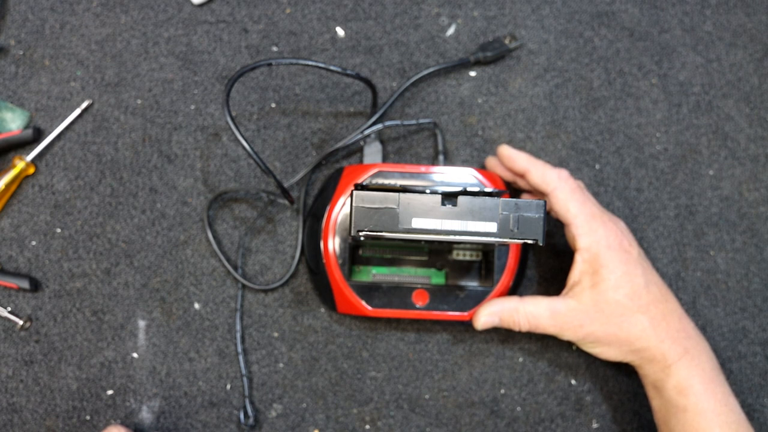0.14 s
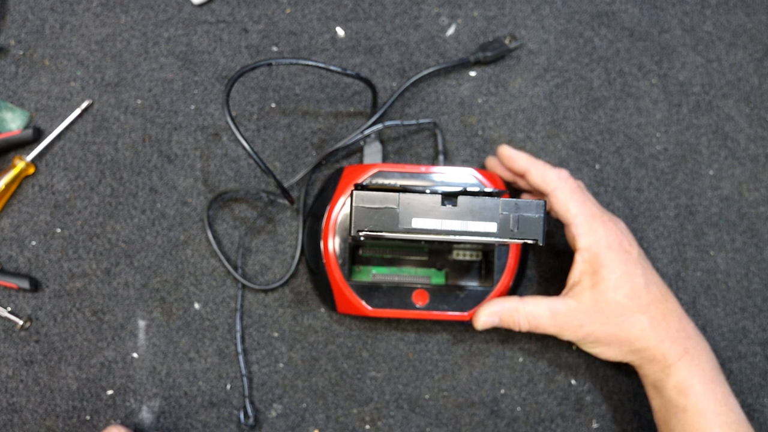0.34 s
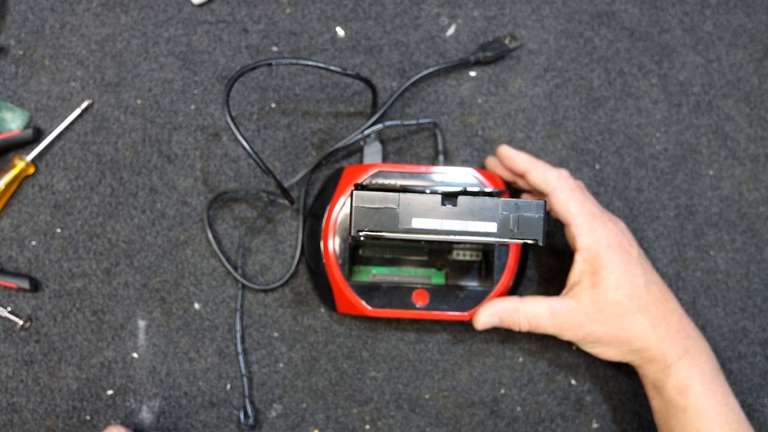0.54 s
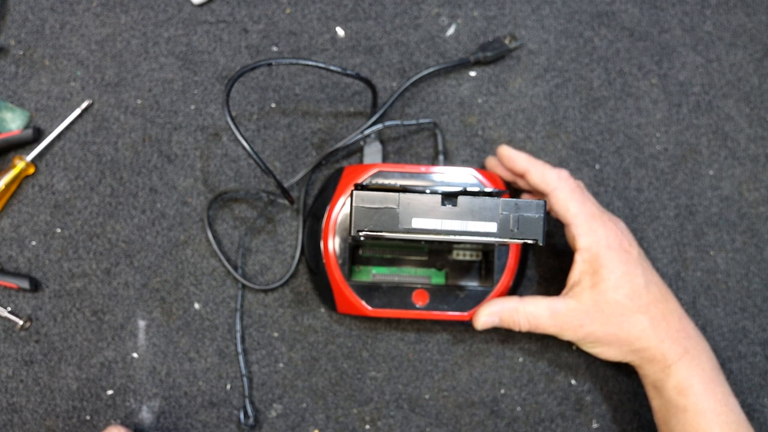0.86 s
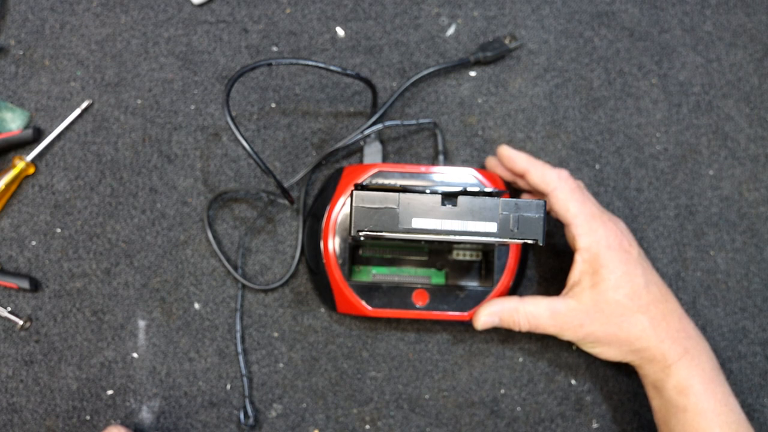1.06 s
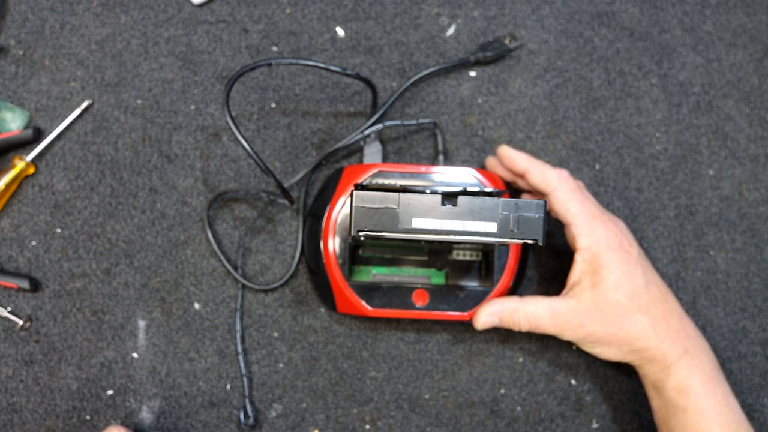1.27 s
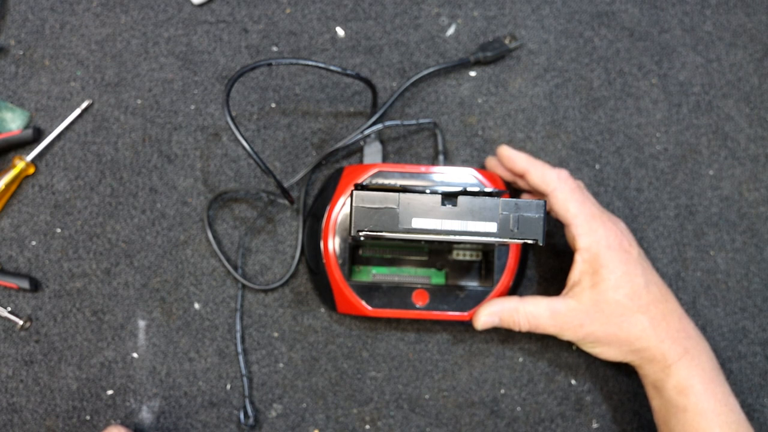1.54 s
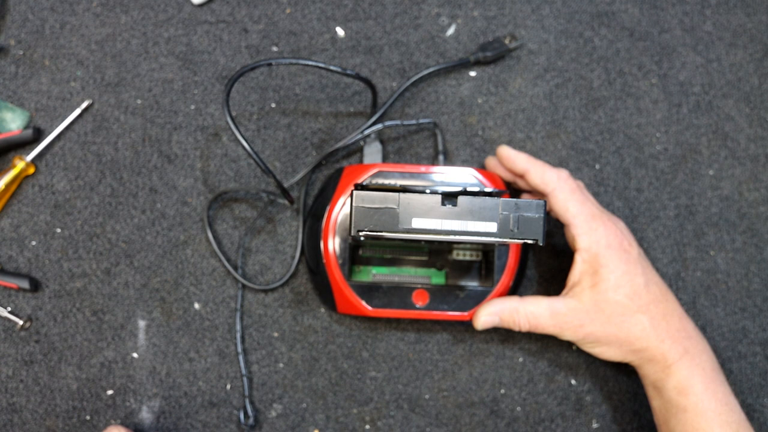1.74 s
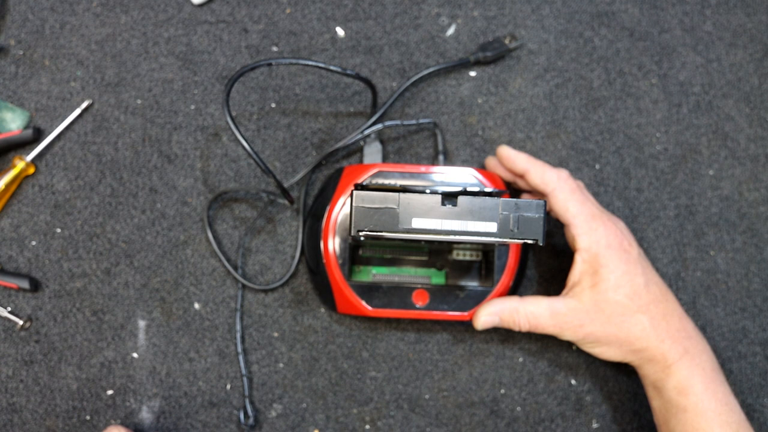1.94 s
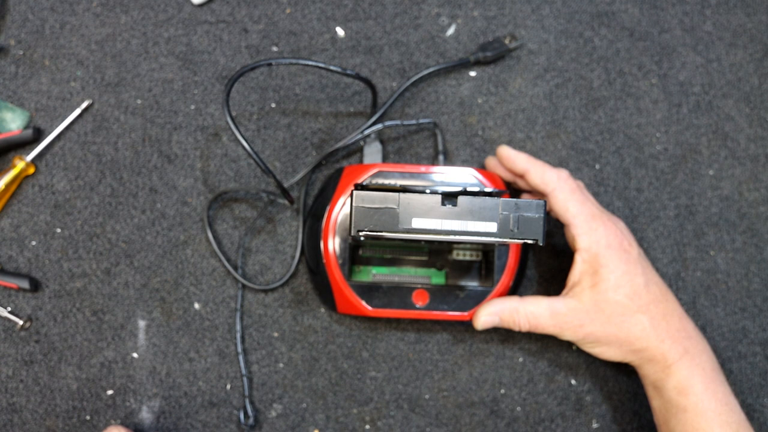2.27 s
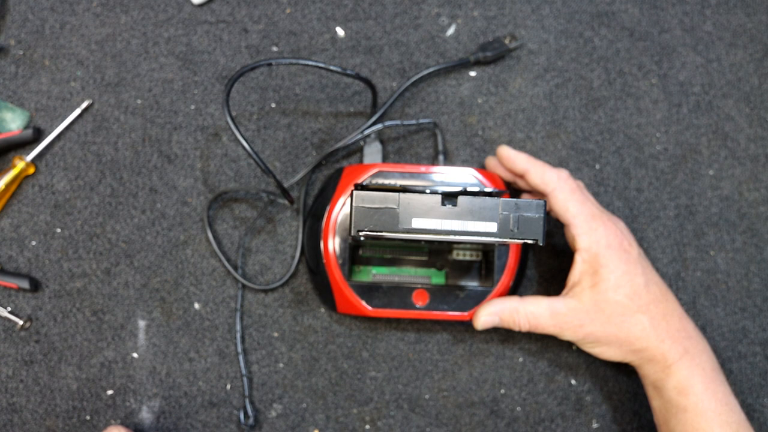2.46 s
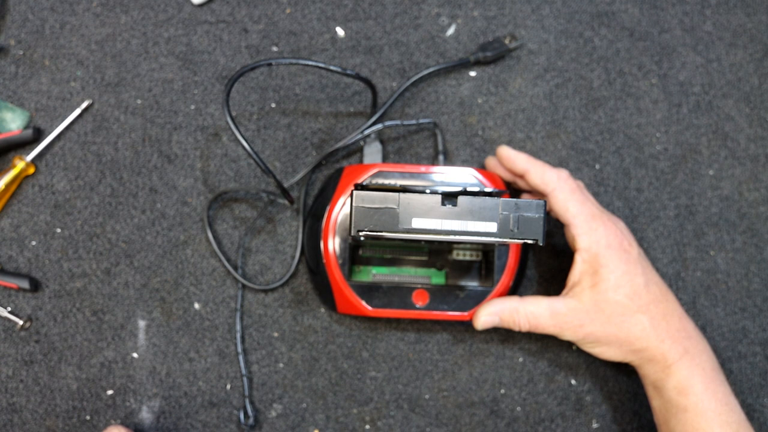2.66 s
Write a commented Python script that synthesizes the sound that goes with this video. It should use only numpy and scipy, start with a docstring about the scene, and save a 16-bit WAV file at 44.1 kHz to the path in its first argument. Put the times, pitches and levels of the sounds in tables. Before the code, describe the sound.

A failing hard drive whines faintly near 2 kHz over low mains hum and a swelling drone in a dry room. Thin hiss starts at 0.08 s; from 0.27 to 0.62 s irregular knocks mix with short raspy, squeaky scrapes. A loud sharp clack with a low thump at 0.72 s ends the hiss. The whine sags around 1.45 and 2.15 s, recovering each time with a slight buzz, amid faint ticks until 2.1 s and one last at 2.77 s.

```python
"""Mains hum and a low swelling drone fill a room where the spindle of a failing hard drive whines in a dock.
The heads load with a thin hiss, then the arm knocks and the heads scrape across the platter.
They park with one sharp clack, and the whine sags and recovers while the mechanism ticks faintly.
Steady tones are summed sines, hiss and rasp are shaped noise, and blows are decaying modes,
most with a dense noise crack; a short sparse tail adds the room to the drive's impacts."""
import sys
import numpy as np
from scipy import signal
from scipy.fft import rfft, irfft, next_fast_len
from scipy.io import wavfile
from scipy.ndimage import uniform_filter1d

SR = 44100
rng = np.random.default_rng(int(sys.argv[2]) if len(sys.argv) > 2 else 0)


def wav_record(signal):
    """Record a signal, one row per channel, as 16-bit PCM in the file named by sys.argv[1]."""
    frames = np.transpose(np.atleast_2d(signal))
    bounded = np.clip(frames, -1, 1)
    # unit amplitude maps onto the largest positive 16-bit level
    quanta = np.round(bounded * 32767).astype(np.int16)
    wavfile.write(sys.argv[1], SR, quanta)


N = 123479
T = np.arange(N) / SR


def amp(db):
    """Decibel law: level to amplitude ratio."""
    return 10 ** (np.asarray(db) / 20)


def unit(x):
    """Normalisation to unit root-mean-square level."""
    return x / np.sqrt(np.mean(x ** 2) + 1e-20)


def add(mix, start_s, sound):
    """Superposition of a sound on the mix from its start time, in place."""
    part = mix[round(start_s * SR):][:len(sound)]
    part += sound[:len(part)]


def coloured(x, points):
    """Spectral shaping: a gain curve drawn in dB over log frequency, then unit level."""
    hz, db = np.transpose(points)
    size = next_fast_len(len(x))
    bins_hz = np.fft.rfftfreq(size, 1 / SR)
    gain = amp(np.interp(np.log(bins_hz + 1), np.log(hz), db))
    return unit(irfft(rfft(x, size) * gain, size)[:len(x)])


def noise(points, size=N):
    """Coloured noise: Gaussian white noise under a spectral shape."""
    return coloured(rng.standard_normal(size), points)


def tone(hz):
    """Phase integration: a unit-level sine on a steady or moving frequency."""
    cycles = np.cumsum(hz * np.ones(N)) / SR + rng.random()
    return np.sqrt(2) * np.sin(2 * np.pi * cycles)


def waver(hz):
    """Band-limited chance: unit-level noise under a Gaussian low-pass of width hz."""
    spectrum = rfft(rng.standard_normal(N))
    low_pass = np.exp(-(np.fft.rfftfreq(N, 1 / SR) / hz) ** 2)
    return unit(irfft(spectrum * low_pass, N))


def ring(modes, size=6000):
    """Modal decay: exponentially dying sines, each started with either sign."""
    t = T[:size]
    out = np.zeros(size)
    for hz, db, t60 in modes:
        out += rng.choice([-1, 1]) * amp(db - 60 * t / t60) * np.sin(2 * np.pi * hz * t)
    return out


BASS_HZ, MID_HZ, TREBLE_HZ = 830, 2420, 4400
CRACK_DECAY_S, RISE_S = .003, .0007
TAIL_DB, TAIL_DECAY_S, TAIL_HIGH_HZ = -17, 0.023, 4700


def blow(modes, crack, crack_db, bass_db, treble_db, size=6000):
    """Impact excitation: modes, a dense crack and its duller tail, tilted by where the blow lands."""
    t = T[:size]
    dense = amp(crack_db) * noise(crack, size=size)
    dull = signal.lfilter(*signal.butter(2, TAIL_HIGH_HZ, fs=SR), dense)
    sound = ring(modes)
    sound += dense * np.exp(-t / CRACK_DECAY_S)
    sound += dull * amp(TAIL_DB) * np.exp(-t / TAIL_DECAY_S)
    bins_hz = np.fft.rfftfreq(2 * size, 1 / SR)
    tilt_db = np.interp(bins_hz, [BASS_HZ, MID_HZ, TREBLE_HZ], [bass_db, 0, treble_db])
    tilted = irfft(rfft(sound, 2 * size) * amp(tilt_db))[:size]
    return tilted * np.minimum(t / RISE_S, 1)


# harmonics of the mains supply: (frequency [Hz], level [dB])
MAINS_HARMONICS = [(50, -45.5), (150, -55.5), (200, -45), (250, -70), (300, -61.5), (350, -61.5),
                   (400, -58)]


def mains_hum():
    """Harmonic series: steady sines at multiples of the mains frequency."""
    return sum(amp(db) * tone(hz) for hz, db in MAINS_HARMONICS)


# swell of the drone's fundamental: (time [s], level [dB])
DRONE_SWELL = [(0.0, -54), (0.05, -49.5), (0.18, -52.5), (0.39, -42), (0.91, -38.5), (1.32, -40.5),
               (2.07, -40), (2.63, -54.5), (2.8, -59)]
DRONE_HZ, DRONE_FIFTH_DB = 97.35, -16.5


def drone():
    """Amplitude envelope: a low tone and a weaker pure fifth above it swell and fade together."""
    swell = amp(np.interp(T, *np.transpose(DRONE_SWELL)))
    fifth = amp(DRONE_FIFTH_DB) * tone(DRONE_HZ * 3 / 2)
    return swell * (tone(DRONE_HZ) + fifth)


# spectral shape of the even room noise: (frequency [Hz], relative density [dB])
AIR_SHAPE = [(20, -92), (45, -71.5), (130, -78), (230, -80.5), (330, -86), (520, -87), (800, -86),
             (1060, -88.5), (1500, -94), (2500, -97.5), (2950, -92), (3300, -99), (3700, -94.5),
             (4000, -100), (4300, -99.5), (4800, -101), (6000, -101), (10000, -104), (15500, -106)]
# spectral shape of the low rumble: (frequency [Hz], relative density [dB])
RUMBLE_SHAPE = [(20, -39), (60, -54), (80, 17), (95, 2), (125, -45), (400, -32)]
AIR_DB, RUMBLE_DB = -52, -56


def room_noise():
    """Stationary noise: an even room sound and a low rumble."""
    return amp(AIR_DB) * noise(AIR_SHAPE) + amp(RUMBLE_DB) * noise(RUMBLE_SHAPE)


# course of the spindle speed, smoothed below: (time [s], speed [turns/s])
SPINDLE_COURSE = [(0, 83.3), (.96, 83.5), (1.2, 79.9), (1.42, 76.8), (1.49, 76.9), (1.66, 80.8),
                  (1.9, 77.4), (2.12, 74.3), (2.2, 74.8), (2.54, 82.5), (2.8, 83.6)]
FULL_PUSH_TURNS_PER_S2 = 9.4


def spindle_motion():
    """Rotational kinematics: the speed, and the motor's push (0 to 1) from its acceleration."""
    spin = uniform_filter1d(np.interp(T, *np.transpose(SPINDLE_COURSE)), size=2000)
    push = np.clip(np.gradient(spin) * SR / FULL_PUSH_TURNS_PER_S2, 0, 1)
    return spin, push


# orders of the whine: (multiple of the spindle speed)
WHINE_MULTIPLES = (24, 25)
# base level of each order, before resonance and push: (level [dB])
WHINE_LEVELS = [-66.5, -64.5]
WHINE_PEAK_HZ, WHINE_WIDTH_HZ, WHINE_OFF_DB = 2030, 95, -28
PUSH_DB = 3.5


def whine(spin, push):
    """Resonance: orders of the spindle speed grow as they near a mode of the case."""
    out = np.zeros(N)
    # only the first order grows with the push
    for order, db, driven in zip(WHINE_MULTIPLES, WHINE_LEVELS, (push, 0)):
        hz = order * spin
        near = 1 / np.hypot(1, ((hz - WHINE_PEAK_HZ) / WHINE_WIDTH_HZ) ** 2)
        out += amp(db + PUSH_DB * driven) * (amp(WHINE_OFF_DB) + near) * tone(hz)
    return out


# mean level of the buzz lines at full push: (frequency [Hz], level per line [dB])
BUZZ_LEVELS = [(300, -61), (900, -77), (2000, -73.5), (2900, -75.5), (3800, -88), (5200, -81.5),
               (9000, -82.5), (15000, -91)]
POLE_PAIRS, BUZZ_SCATTER_DB, BUZZ_FLICKER_HZ = 4, 2, 45


def motor_buzz(spin, push):
    """Electromagnetic forcing: ragged harmonics of the pole-pair rate while the motor speeds up."""
    out = np.zeros(N)
    for harmonic in range(2, 48):
        hz = harmonic * POLE_PAIRS * spin
        db = np.interp(hz.mean(), *np.transpose(BUZZ_LEVELS))
        db += BUZZ_SCATTER_DB * rng.standard_normal()
        out += amp(db) * np.sqrt(push) * waver(BUZZ_FLICKER_HZ) * tone(hz)
    return out


# hiss of the flying heads, with narrow whistles: (frequency [Hz], relative density [dB])
HEAD_HISS = [(1500, -20), (2300, -4), (3850, -7), (4000, 6), (4150, -8), (4520, -1), (4750, -11), (4970, 6),
             (5120, -13), (6300, -18), (7000, -6), (8200, -9), (8650, 1), (9300, -2), (10100, -9),
             (10800, -3), (11950, -11), (12500, -5), (13400, -17), (14600, -15), (14900, -1), (15200, -18),
             (16000, -26)]
HEADS_ON_S, HEADS_OFF_S, HEADS_FADE_S = .076, .708, .012
HEADS_DB, HEADS_FLUTTER_DB, HEADS_FLUTTER_HZ = -53.5, 1.3, 80


def heads():
    """Flow noise: a thin, unsteady hiss for as long as the heads fly over the platter."""
    flying = np.clip(np.minimum(T - HEADS_ON_S, HEADS_OFF_S - T) / HEADS_FADE_S, 0, 1)
    level = amp(HEADS_DB + HEADS_FLUTTER_DB * waver(HEADS_FLUTTER_HZ))
    return level * flying * noise(HEAD_HISS)


# knocks of the arm, and two late low ticks of the mechanism, before the case:
# (time [s], level [dB], bass tilt [dB], treble tilt [dB])
KNOCK_HITS = [(0.2687, -31.5, 10, 7.5), (.273, -32, 13, -10), (.278, -35.5, 19, -25),
              (.282, -33.5, 14, 1.5), (.2915, -43.5, 15, 3), (0.308, -40.5, 16, 3.5),
              (.3325, -34.5, 16, -3.5), (.357, -42.5, 14, -6), (.368, -46, 19, -2), (.379, -53, 11, -3),
              (.4005, -37.5, 2, 6), (.4065, -40, 18.5, -18), (.4095, -33.5, 10.5, -5), (.413, -51, -8, -14),
              (.4225, -41.5, 20, 1.5), (.4405, -33, 12.5, -10), (.4475, -31.5, 6.5, -13),
              (.458, -43.5, 6, 9.5), (.461, -45.5, 22, -5), (.4865, -35, 13.5, -6), (.516, -48.5, 20, -7),
              (.557, -48, 24.5, -10), (.574, -40.5, 17, -6), (.584, -31.5, 10, -0.5),
              (.6035, -35.5, 14.5, -6), (.617, -31, 6.5, -5), (.623, -45, 19, 6), (1.662, -61, 21, -1),
              (2.769, -60.5, 18, 3.5)]
# modes of the case and arm, before detuning: (frequency [Hz], relative level [dB], decay by 60 dB [s])
CASE_MODES = [(715, -12.5, 0.045), (775, -13.5, 0.05), (825, -15, 0.045), (930, -16.5, 0.035),
              (1445, -25, 0.12), (2125, -2, 0.045), (2310, -5, 0.06), (2650, -3, 0.045), (3340, -4, 0.03),
              (3895, -10, 0.11), (4235, -1.5, 0.05), (4980, -7, 0.03), (5170, -5, 0.065), (5520, -10, 0.06),
              (7100, -15, 0.02)]
# spectral shape of a knock's dense crack: (frequency [Hz], relative density [dB])
KNOCK_CRACK = [(200, -26), (550, -40), (690, -8.5), (900, -12.5), (1200, -24), (1800, -22), (2150, 5.5),
               (3700, -6), (4400, 6), (4750, -0.5), (5350, 5.5), (5900, -20), (7100, -7), (9500, -25),
               (15000, -12.5)]
KNOCK_CRACK_DB = 2.5  # against the modes
# mode of the lid, before the case: (frequency [Hz], level [dB], decay by 60 dB [s])
LID_MODE = [(3910, -30.5, 0.14)]
LID_S = .586


def knocks():
    """Modal excitation: arm knocks and two late low ticks, each with slightly scattered mode
    frequencies, and once the lid rings."""
    out = np.zeros(N)
    for start_s, db, bass_db, treble_db in KNOCK_HITS:
        modes = [(hz * (1 + rng.uniform(-.0116, .008)), mode_db, t60) for hz, mode_db, t60 in CASE_MODES]
        add(out, start_s, amp(db) * blow(modes, KNOCK_CRACK, KNOCK_CRACK_DB, bass_db, treble_db))
    add(out, LID_S, ring(LID_MODE))
    return out


# scraping seeks, before the case: (time [s], length [s], level [dB])
SEEKS = [(0.336, 0.014, -46), (.352, 0.0064, -36.5), (0.36, 0.0092, -37), (0.371, 0.014, -38.5),
         (0.387, 0.0072, -31.5), (0.407, 0.01, -41), (0.426, 0.0034, -41), (0.437, 0.012, -45.5),
         (0.49, 0.0247, -45), (0.513, 0.012, -39.5), (0.524, 0.012, -35), (0.54, 0.0059, -35),
         (0.555, 0.0052, -36.5), (.563, 0.0063, -34.5), (0.584, 0.0061, -39), (0.599, 0.0054, -44),
         (0.693, 0.0087, -48.5)]
# spectral shape of the rasp: (frequency [Hz], relative density [dB])
RASP_SHAPE = [(540, -12), (780, -1), (1200, -13), (1800, -17.5), (2100, 2.5), (2700, 4), (3100, 0.5),
              (3450, -2.5), (4050, -2), (4400, -14), (4750, -5), (5200, -1), (6000, -7), (6900, -3.5),
              (7700, -20), (13000, -15)]
# modes of the head suspension: (frequency [Hz], relative level [dB], decay by 60 dB [s])
SUSPENSION_MODES = [(2650, -1, 0.025), (3895, -4, 0.07), (4290, -1, 0.03), (4490, -.5, 0.03)]
SLIPS_PER_S, SCRAPE_EDGE_S, SCRAPE_RING_DB = 2400, .002, -2
SQUEAL_HZ, SQUEAL_JITTER_HZ, SQUEAL_WAVER_HZ = 4230, 45, 200
SQUEAL_BUILD_S, SQUEAL_DB = .003, 0


def scraping():
    """Stick-slip friction: dense tiny slips rasp, ring the suspension and build a rough squeal."""
    level = np.zeros(N)
    for start_s, length_s, db in SEEKS:
        inside_s = np.minimum(T - start_s, start_s + length_s - T)
        level += amp(db) * np.clip(inside_s / SCRAPE_EDGE_S + .5, 0, 1)
    slips = rng.choice([-1., 1.], N) * (rng.random(N) < SLIPS_PER_S / SR)
    rasp = level * coloured(slips, RASP_SHAPE)
    body = ring(SUSPENSION_MODES)
    ringing = signal.fftconvolve(level * unit(slips), body / np.linalg.norm(body))[:N]
    # one-pole smoothing makes the squeal build up and die away
    keep = np.exp(-1 / (SQUEAL_BUILD_S * SR))
    squeal_level = signal.lfilter([1 - keep], [1, -keep], level)
    squeal = squeal_level * tone(SQUEAL_HZ + SQUEAL_JITTER_HZ * waver(SQUEAL_WAVER_HZ))
    return rasp + amp(SCRAPE_RING_DB) * ringing + amp(SQUEAL_DB) * squeal


# the arm's hit and rebounds: (time [s], level [dB], bass tilt [dB], treble tilt [dB])
PARK_HITS = [(.7163, -20, -5.5, -3.5), (.7222, -35, 5, 3), (.725, -38.5, 9.5, -18)]
# modes of the stop: (frequency [Hz], relative level [dB], decay by 60 dB [s])
STOP_MODES = [(765, -1.5, 0.048), (905, -10, 0.035), (1600, -13, 0.04), (2555, 4.5, 0.026),
              (2680, 3.5, 0.022), (3150, -1, 0.018), (3420, 0, 0.016), (3850, 3, 0.018), (4315, 2, 0.02),
              (4970, 6, 0.018), (6100, -7, .018), (6950, 0, 0.015), (11000, -10, .01), (13610, -9, .011)]
# spectral shape of the stop's dense crack: (frequency [Hz], relative density [dB])
STOP_CRACK_SHAPE = [(150, -8), (590, -34), (740, 13), (1200, -4), (2050, -4), (2700, 6), (5200, -6),
                    (5800, -5), (7700, 0), (9300, -10), (14000, -11), (15500, -20)]
STOP_CRACK_DB = 3.5  # against the modes
# thump of the dock: (frequency [Hz], level [dB], decay by 60 dB [s])
DOCK_THUMP = [(209.3, -36.5, 0.16)]
THUMP_S = .722


def parking():
    """Impact and rebound: the arm slams into its stop and jolts the dock into a low thump."""
    out = np.zeros(N)
    for start_s, db, bass_db, treble_db in PARK_HITS:
        add(out, start_s, amp(db) * blow(STOP_MODES, STOP_CRACK_SHAPE, STOP_CRACK_DB, bass_db, treble_db))
    add(out, THUMP_S, ring(DOCK_THUMP))
    return out


# faint ticks: (time [s], level [dB])
TICK_TIMES = [(0.767, -46), (0.777, -52.5), (0.978, -52.5), (1.2913, -53), (1.3994, -47), (1.662, -53),
              (1.976, -53.5), (2.0844, -46.5)]
# modes of a tick: (frequency [Hz], relative level [dB], decay by 60 dB [s])
TICK_MODES = [(2700, -1, 0.029), (3000, -3, 0.013), (4280, 5.5, 0.021), (5150, 3.5, 0.01),
              (5800, -9, 0.005)]


def ticks():
    """Free vibration: each faint tick is a brief ring of the same few modes."""
    out = np.zeros(N)
    for start_s, db in TICK_TIMES:
        add(out, start_s, amp(db) * ring(TICK_MODES))
    return out


CASE_LOW_HZ, CASE_HIGH_HZ = 650, 12500


def through_case(x):
    """Band-limited transmission: the small closed case lets out neither bass nor the highest treble."""
    band = signal.butter(N=6, Wn=[CASE_LOW_HZ, CASE_HIGH_HZ], btype="bandpass", fs=SR, output="sos")
    return signal.sosfilt(band, x)


ROOM_DB, ROOM_T60_S = -10.5, 0.048


def room(x, size=12000):
    """Reverberation: convolution with a short, weak decay of sparse reflections."""
    t = T[:size]
    sparse = (rng.random(size) < .1) * (t > .003)  # a tenth of the samples, after 3 ms
    taps = rng.standard_normal(size) * sparse * amp(-60 * t / ROOM_T60_S)
    return x + amp(ROOM_DB) * signal.fftconvolve(x, taps / np.linalg.norm(taps))[:N]


SIDE_DB = -77.5


def scene():
    """Superposition: all sources in the centre, with a trace of opposite-sign hiss between channels."""
    spin, push = spindle_motion()
    steady = mains_hum() + drone() + room_noise() + whine(spin, push) + motor_buzz(spin, push) + heads()
    inside = knocks() + scraping()
    centre = steady + room(through_case(inside) + parking() + ticks())
    side = amp(SIDE_DB) * rng.standard_normal(N)
    return np.array([centre + side, centre - side])


EDGE_HZ = 15780


def record(dry):
    """Linear-phase filtering: a steep low-pass limits the band of both channels."""
    low_pass = signal.firwin(511, EDGE_HZ, window=("kaiser", 9), fs=SR)
    return signal.oaconvolve(dry, low_pass[None], "same")


dry = scene()
out = record(dry)
wav_record(out)
```